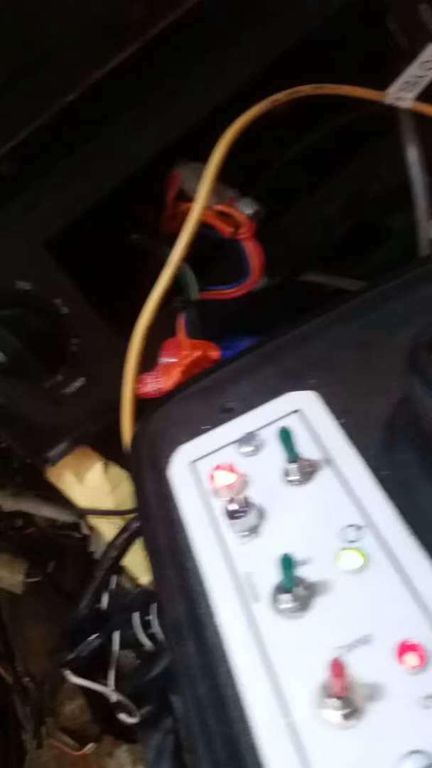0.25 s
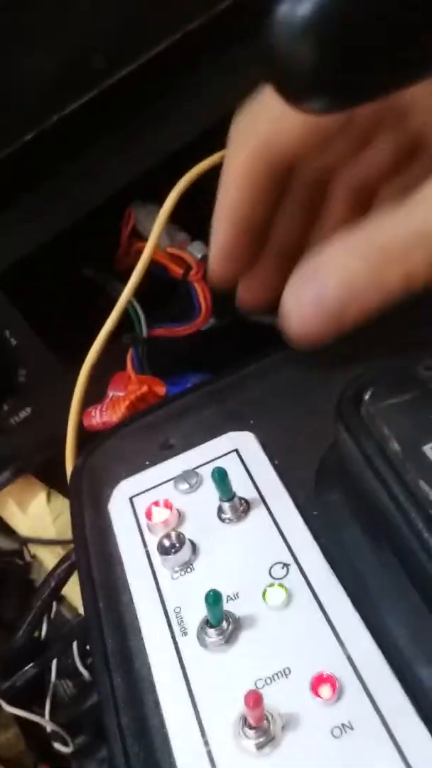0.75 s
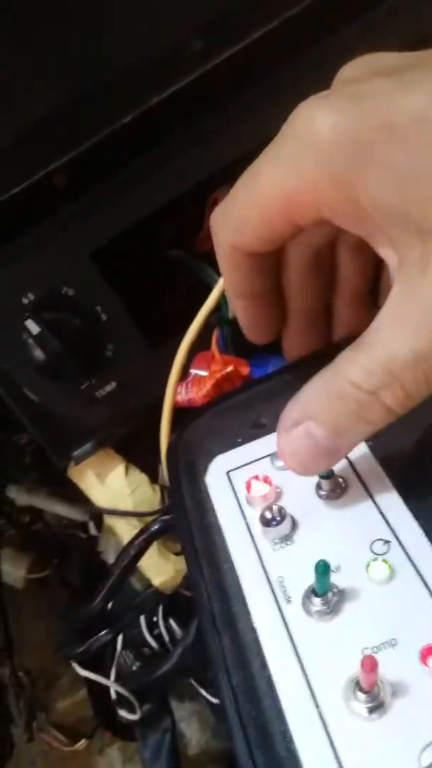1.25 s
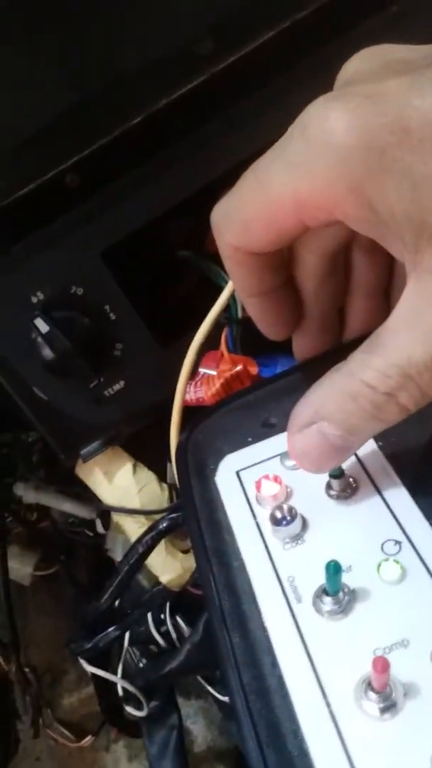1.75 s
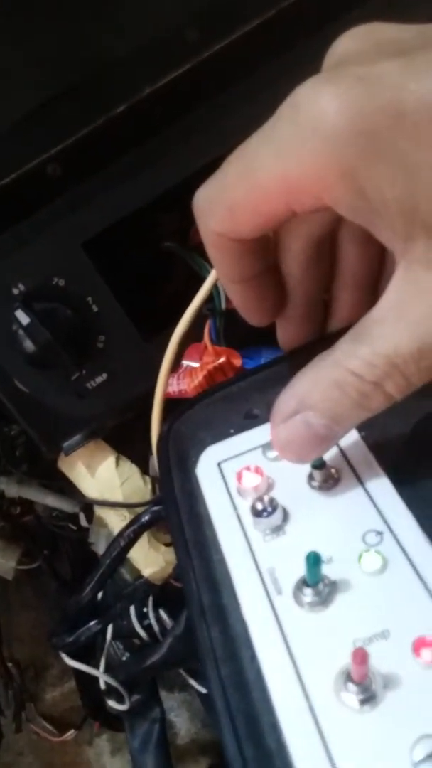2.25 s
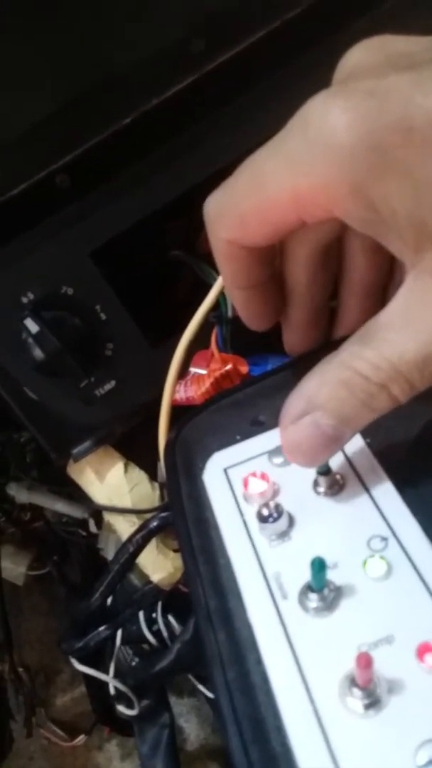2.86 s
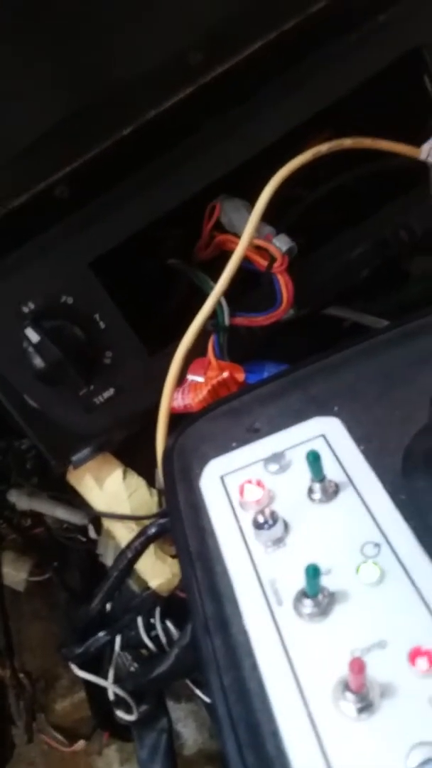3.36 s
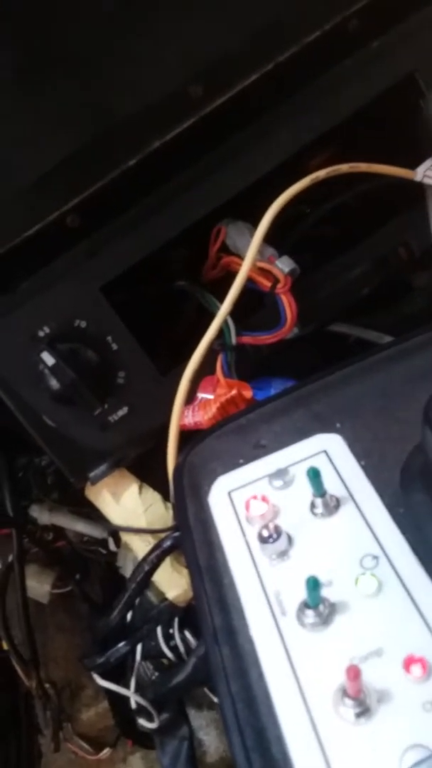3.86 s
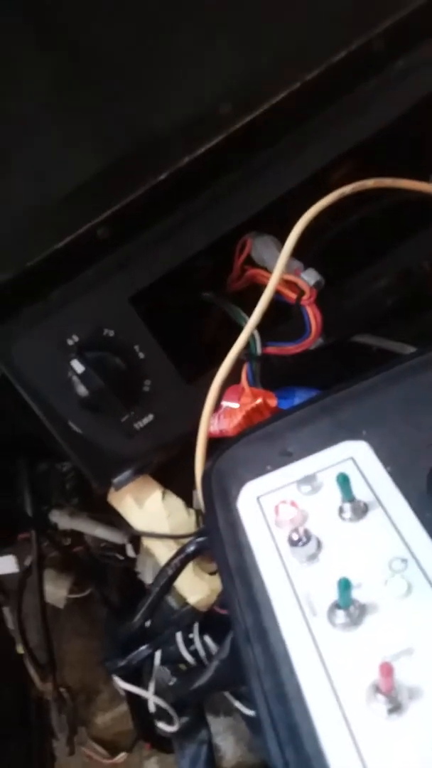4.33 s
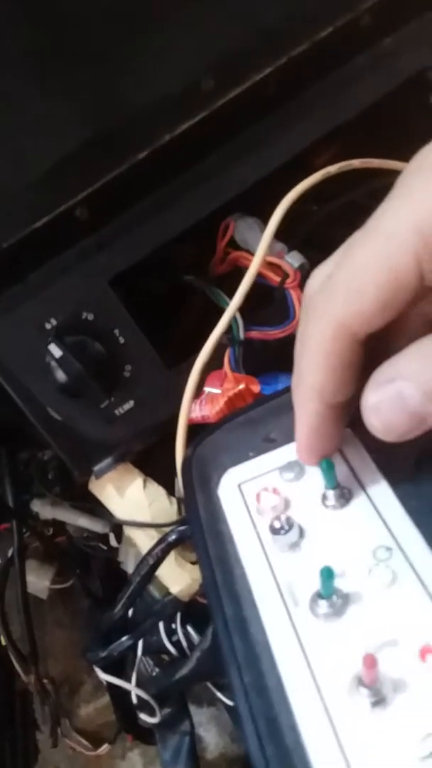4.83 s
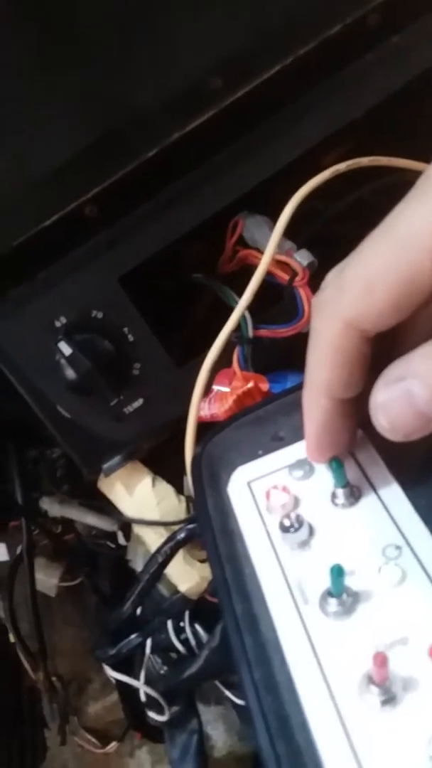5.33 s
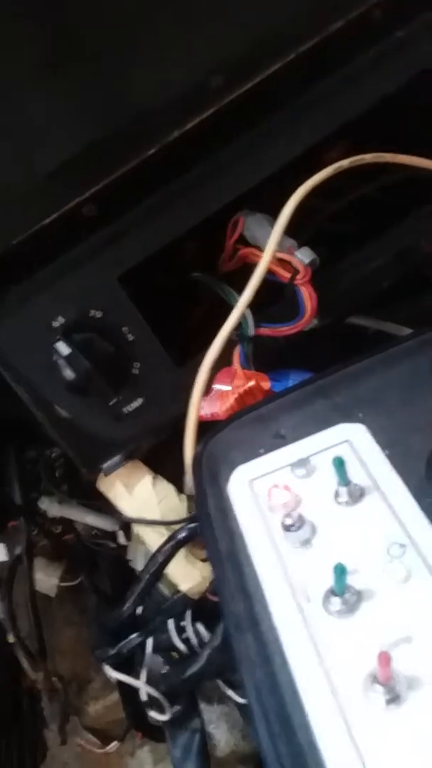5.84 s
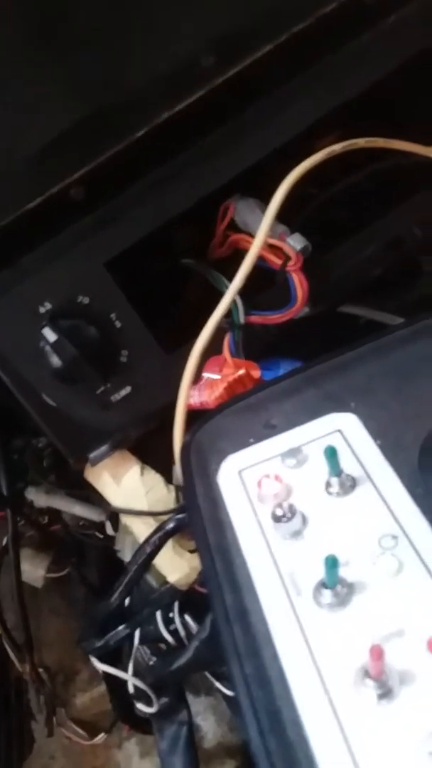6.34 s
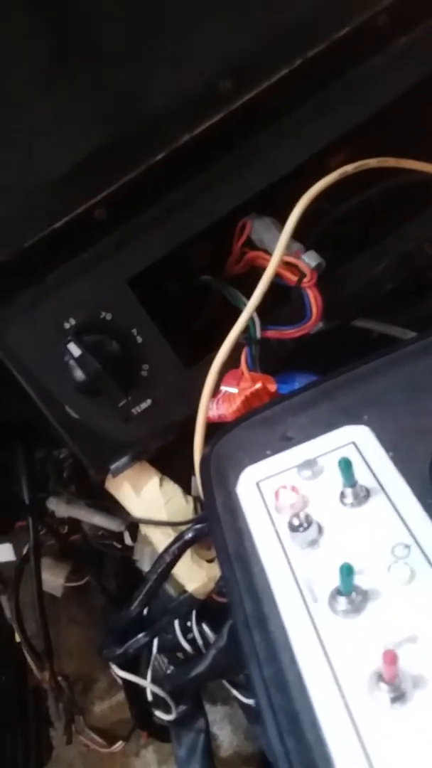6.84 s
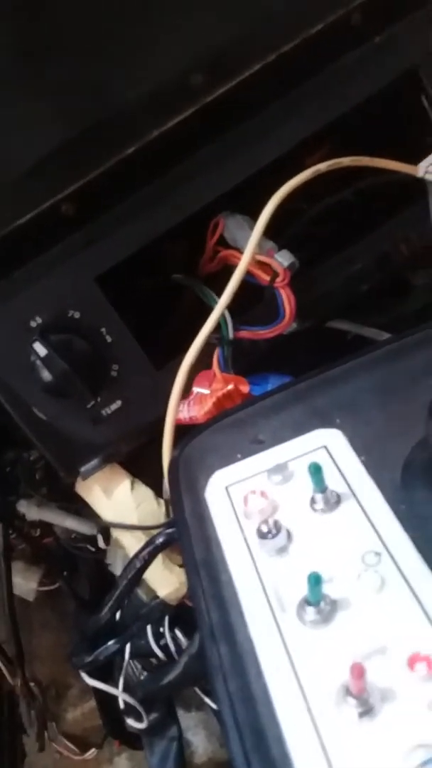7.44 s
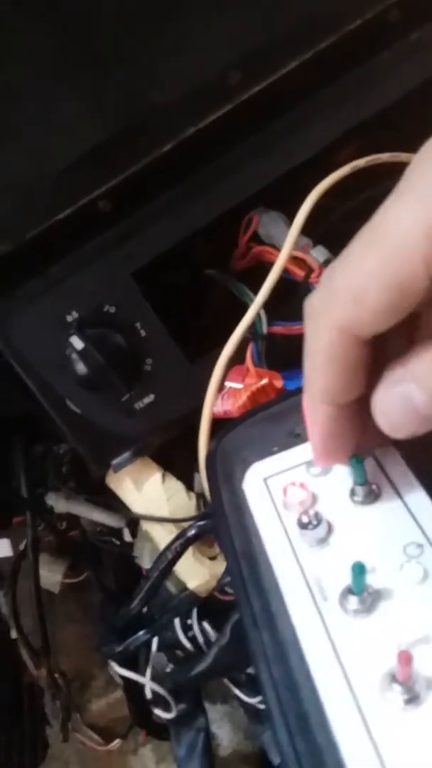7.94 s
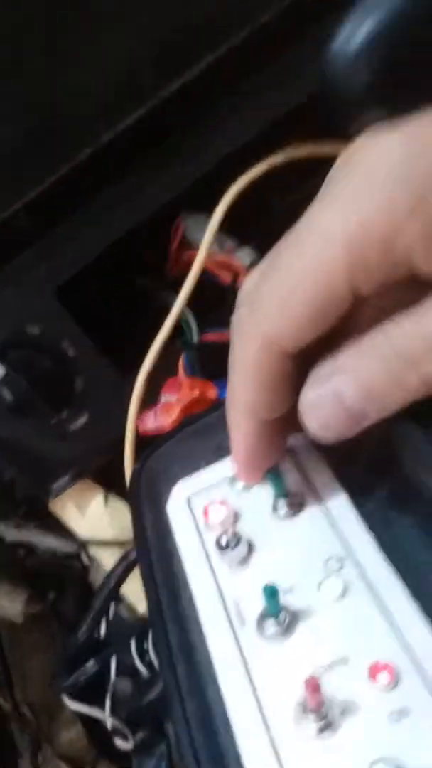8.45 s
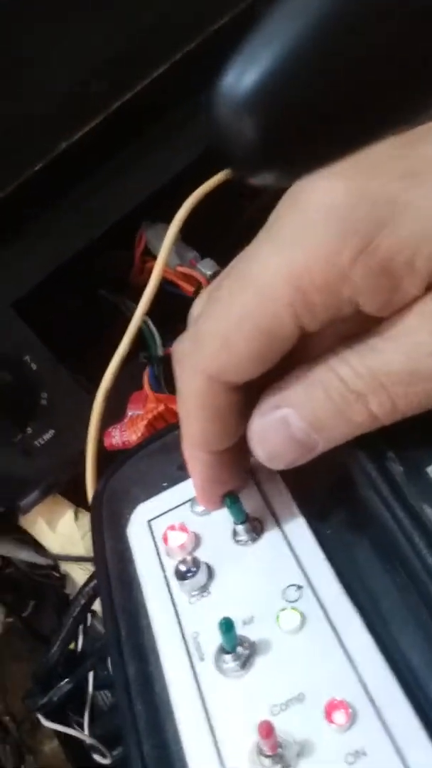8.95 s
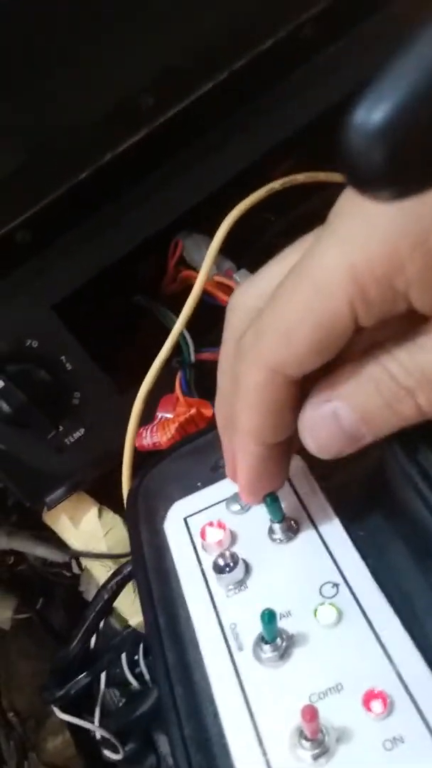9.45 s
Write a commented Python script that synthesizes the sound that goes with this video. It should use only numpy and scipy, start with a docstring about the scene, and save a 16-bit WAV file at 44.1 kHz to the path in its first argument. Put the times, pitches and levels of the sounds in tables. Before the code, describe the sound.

A handheld stereo microphone in a small, soft-trimmed cabin hears rumbling duct air and hissy vents, with motor hum underneath. Two isolated switch clicks come first. Then a loud cluster of clacks steps the blower down, and a finger bumps the microphone with a boom that makes the sound dip briefly. The fan spins down, leaving the compressor's steady drone, narrow whine and faint hiss.

```python
"""Blower and compressor in a vehicle

A ventilation blower rushes: turbulent noise shaped by ducts and vents. It is turned down and slows.
A mains-driven compressor hums, its shaft beating slowly with a second hum, while its valve whines as
noise in narrow resonances. Switches click by ringing plastic housing modes under a short rattle.
A finger knocks the phone, a pressure spike and a falling boom, and its gain ducks for about a second."""
import sys
import numpy as np
from scipy import signal
from scipy.fft import rfft, irfft, next_fast_len
from scipy.io import wavfile
from scipy.ndimage import uniform_filter1d

SR = 44100
rng = np.random.default_rng(int(sys.argv[2]) if len(sys.argv) > 2 else 0)


def dump(signal):
    """Clip the signal to [-1, 1] and save it as 16-bit WAV at the path in sys.argv[1]."""
    limited = np.clip(np.atleast_2d(signal).T, -1, 1)
    pcm = np.round(limited * 32767).astype(np.int16)
    wavfile.write(sys.argv[1], SR, pcm)


N = 427329
T = np.arange(N) / SR
SIZE = next_fast_len(N)
HZ = np.maximum(np.arange(SIZE // 2 + 1) * SR / SIZE, 1.)
SIDE = np.array([[1], [-1]])  # left, right
SHAFT_HZ = 58.15


def undb(db):
    """Decibel law: amplitude gain of a dB value."""
    return 10 ** (np.asarray(db) / 20)


def level(x, db):
    """Root mean square: scale both ports so that their mean has this rms in dB."""
    return x * undb(db) / np.sqrt(np.mean(x.mean(0) ** 2))


def shape(table, hz=HZ):
    """Logarithmic frequency scale: interpolate a (Hz, value) table on it."""
    table_hz, values = np.transpose(table)
    return np.interp(np.log(hz), np.log(table_hz), values)


def colour(table):
    """Spectral envelope: gain at each frequency from a (Hz, dB) table."""
    return undb(shape(table))


def resonances(modes, order):
    """Resonance: gain of several (Hz, width Hz, dB) peaks whose powers add; a higher order is narrower."""
    power = 0
    for hz, width, db in modes:
        detuning = (HZ ** 2 - hz ** 2) / (HZ * width)
        power = power + undb(db) ** 2 / (1 + detuning ** 2) ** order
    return np.sqrt(power)


def walk(rate):
    """Slow random fluctuation: levels held 1 / rate seconds and slewed twice, with a spread near 1."""
    k = int(SR / rate)
    held = np.repeat(rng.standard_normal(N // k + 1), k)
    return 1.43 * uniform_filter1d(uniform_filter1d(held, k), k)[:N]


def settle(start_s, time_s):
    """Exponential relaxation: share 0-1 of a change that begins at start_s."""
    return 1 - np.exp(-np.maximum(T - start_s, 0) / time_s)


def tone(hz, db):
    """Phase accumulation: a sine on a steady or moving pitch, rms level in dB."""
    turns = np.cumsum(hz + 0 * T) / SR + rng.random()
    return np.sqrt(2) * undb(db) * np.sin(2 * np.pi * turns)


# share of noise power common to both ports: frequency_hz, likeness (0-1)
PORT_LIKENESS = [(60, 1), (250, 0.93), (330, 0.81), (400, 1), (750, 0.76), (980, 0.65), (1150, 0.68),
                 (1600, 0.48), (2000, 0.59), (3000, 0.19), (6000, 0.15), (16000, 0.05)]
# level difference of the ports: frequency_hz, left_minus_right_db
PORT_BALANCE = [(60, 4), (130, -3.5), (190, 1), (290, -3.5), (450, 5), (630, 2), (800, -3.5), (1300, -4.5),
                (2000, -6.5), (2700, -0.5), (4000, 3), (7000, -2), (9000, 6.5), (14000, 0.5)]
# phase difference of the ports: frequency_hz, left_lead_rad
PORT_LEAD = [(60, -0.5), (250, 0.44), (420, 1), (680, 0), (830, 0.33), (1000, 2), (1300, 3), (1500, 4.5),
             (1940, 4.5), (2400, 5.5), (3300, 9), (6000, 18.5), (16000, 40)]


def ports(gain, drive=1):
    """Partial coherence: two ports pick up shared noise with a phase lead, plus noise of their own."""
    likeness = np.clip(shape(PORT_LIKENESS), 0, 1)
    pickup = undb(SIDE * shape(PORT_BALANCE) / 2)
    shared = np.sqrt(likeness) * pickup * np.exp(.5j * shape(PORT_LEAD) * SIDE)
    own = np.sqrt(1 - likeness) * pickup
    # gain that the mean of both ports keeps, divided out below
    centre = np.sqrt(np.abs(shared.mean(0)) ** 2 + (own ** 2).sum(0) / 4)
    noise = rfft(drive * rng.standard_normal((3, N)), SIZE)
    return irfft((noise[0] * shared + noise[1:] * own) * gain / centre, SIZE)[:, :N]


# steps that turn the blower down: start_s, flow_change_db, time_constant_s
TURN_DOWNS = [(6.3, -8.5, 0.35), (6.9, -9, 0.65), (7.2, -12, 0.79)]
# spectrum of air in the ducts: frequency_hz, relative_level_db (per Hz)
DUCT_SPECTRUM = [(39, -20), (66, -9), (85, -10), (106, -1.5), (124, -0.5), (198, -3), (317, -11.5),
                 (469, -14), (864, -14), (1160, -19), (1450, -16), (1640, -22.5), (1980, -17.5),
                 (2180, -24), (2800, -41), (3640, -59), (6160, -120)]
# duct resonances: frequency_hz, width_hz, level_db (over the broad rush)
DUCT_MODES = [(101.8, 13, 1.5), (146.6, 13.5, 0.5), (202.7, 16, 2.5), (258, 17, -1), (278, 37, 1.5),
              (855, 107, 1), (1422, 44, 3.5), (1532, 55, 5.5)]
# spectrum of jets at the vents: frequency_hz, relative_level_db (per Hz)
VENT_SPECTRUM = [(1410, -35), (2400, -0.5), (3100, -11.5), (3500, -9.5), (4720, -16), (8020, -16),
                 (9880, -28.5), (12800, -24.5), (14500, -30.5), (16400, -30)]


def blower():
    """Flow noise: turbulence fills ducts and vents; jets die faster than the rumble as the flow falls."""
    flow_db = sum(db * settle(s, time_s) for s, db, time_s in TURN_DOWNS)
    duct_gain = colour(DUCT_SPECTRUM) * np.sqrt(1 + resonances(DUCT_MODES, order=2) ** 2)
    ducts = level(ports(duct_gain), -30)
    jets = level(ports(colour(VENT_SPECTRUM)), -47.5) * undb(1.04 * walk(6.5))
    return ducts * undb(flow_db + 0.34 * walk(4.29)) + jets * undb(1.25 * flow_db)


# partials of the slowing rotor: multiple, relative_level_db
ROTOR_ORDERS = [(1, 4), (2, -8), (3, -8)]


def rotor():
    """Forced vibration: a slowing rotor shakes its mount most near resonance; a thin whine sinks."""
    start_s, start_hz, end_hz, settle_s, rotor_db = 7.3, 53.5, 47.1, 1.8, -50
    mount_hz, mount_width_hz = 51, 3
    shaft_hz = start_hz + (end_hz - start_hz) * settle(start_s, settle_s)
    mount_db = -10 * np.log10(1 + (2 * (shaft_hz - mount_hz) / mount_width_hz) ** 2)
    shake = 0
    for k, db in ROTOR_ORDERS:
        resonance_db = mount_db * (k == 1)  # only the fundamental meets the mount's resonance
        shake = shake + tone(k * shaft_hz, rotor_db + db + resonance_db)
    shake = shake * settle(start_s, 0.13)

    whine_s, whine_start_hz, whine_end_hz, whine_settle_s = 7.6, 686, 604, .72
    whine_hz = whine_start_hz + (whine_end_hz - whine_start_hz) * settle(whine_s, whine_settle_s)
    whine_db = -51.5 - 3.5 * np.maximum(T - whine_s, 0)  # fades 3.5 dB a second
    whine = tone(whine_hz + 0.52 * walk(11), whine_db + 0.62 * walk(8))
    return shake + settle(whine_s, 0.04) * whine


# second hum, interpolated between rows: time_s, hz_above_shaft, level_db
SECOND_HUM = [(0, 0.21, -41), (1.3, 0.77, -39.5), (3.5, 0.94, -39), (4.3, 0.51, -38), (5.35, 0.62, -32.5)]


def shafts():
    """Beats: the compressor shaft hums beside a slightly faster second hum, which then dies."""
    shaft_db, lead_turns, dies_s = -41.5, -0.36, 0.074
    s, faster_hz, second_db = np.transpose(SECOND_HUM)
    turns = SHAFT_HZ * T + rng.random()
    lead = lead_turns + np.cumsum(np.interp(T, s, faster_hz)) / SR
    second_gain = undb(np.interp(T, s, second_db)) * (1 - settle(s[-1], dies_s))
    shaft = undb(shaft_db) * np.sin(2 * np.pi * turns)
    second = second_gain * np.sin(2 * np.pi * (turns + lead))
    return np.sqrt(2) * (shaft + second)


# steady tones of mains and motor: frequency_hz, level_db
MAINS_AND_MOTOR = [(120, -36.5), (178.3, -55.5), (233, -50), (240, -48), (725, -67), (753.7, -61.5),
                   (790, -62), (1513, -62.5), (2908, -67.5), (7154, -82), (7506, -77)]


def steady_tones():
    """Line spectrum: sines of mains and motor waver slightly, each with its balance at the ports."""
    hum = 0
    for hz, db in MAINS_AND_MOTOR:
        balance = undb(.5 * SIDE * shape(PORT_BALANCE, hz))
        hum = hum + tone(hz, db + 0.2 * walk(7.8)) * balance
    return hum


# valve whine resonances: frequency_hz, width_hz, relative_level_db
VALVE_MODES = [(1860, 17, -14.5), (1939, 24, 0.5), (1954, 22, 2), (1994, 18, 3.5), (2126, 56, -10)]
# low throb of the pump head: frequency_hz, width_hz, relative_level_db
HEAD_MODES = [(650, 150, 0), (849, 81, -.6)]


def gas_pulses():
    """Modulated noise in resonators: gas puffs twice a turn and excites the valve and pump head."""
    turn = 2 * np.pi * SHAFT_HZ * T
    puff = 1 + 0.16 * np.cos(turn) + .5 * np.cos(2 * turn)
    flutter = undb(1.2 * walk(9.1) + 2.3 * walk(30))
    whine = level(ports(resonances(VALVE_MODES, order=2), puff * flutter), -43)
    head = level(ports(resonances(HEAD_MODES, order=2), puff), -55.5)
    return whine + head


# spectrum of the compressor casing: frequency_hz, relative_level_db (per Hz)
CASING_SPECTRUM = [(39, -29), (66, -9), (84, -15), (100, -13.5), (124, -8.5), (169, -12), (246, -13.5),
                   (317, -24), (376, -21), (484, -27.5), (621, -22.5), (1150, -30.5), (1640, -27),
                   (1980, -15), (2320, -30.5), (2800, -54), (3640, -68), (6160, -120)]


def casing():
    """Structural radiation: the compressor casing rumbles as steady coloured noise."""
    return level(ports(colour(CASING_SPECTRUM)), -42.5)


# plastic housing modes: frequency_hz, relative_level_db, t60_s (of the mode alone)
HOUSING_MODES = [(1420, -3.5, 0.018), (2530, -7, 0.015), (3400, -7, 0.018), (3770, -6.5, 0.015),
                 (4320, -10, 0.0065), (5416, -3, .008), (6130, -6, 0.0088), (6390, -2, 0.011),
                 (6870, 1, 0.0092), (7364, 2.5, 0.011), (7680, -0.5, 0.0063), (8000, -4, .01),
                 (8650, -7, .008), (10400, -10, .006), (11450, -6, 0.005), (11910, -5.5, 0.0053),
                 (12520, -2, 0.0038), (13640, -8, .006), (14400, -4, .006), (15550, -6, 0.005)]
# spectrum of the rattle: frequency_hz, relative_level_db (per Hz)
RATTLE_SPECTRUM = [(530, -39.5), (900, -12), (1430, -3), (2960, -15.5), (4750, -13.5), (5430, -7),
                   (6840, -13), (7540, -29), (8310, -12), (9850, -15), (11700, -11), (15600, -20),
                   (16400, -25)]


def snap(t60, tilt_db, rattle_db, favoured_hz):
    """Modal synthesis: a snap rings the housing modes, some more than others, under noise rattle."""
    t = np.arange(8192) / SR
    hz = np.maximum(np.arange(4097) * SR / 8192, 1.)
    mode_hz, mode_db, mode_t60 = np.transpose(HOUSING_MODES)[:, :, None]
    chance, start = rng.standard_normal((3, 8192)), rng.random((2, len(HOUSING_MODES), 1))
    t60 = max(t60, .003)
    rise = (1 - np.exp(-t / .001)) ** 2

    def tilt(f):
        """Spectral slope: dB per octave about 7 kHz."""
        return tilt_db * np.log2(np.clip(f, 800, 16000) / 7000)

    def favour(f):
        """Selective excitation: a 13 dB bump, .07 octave in half-width, at each favoured pitch."""
        return sum(13 * np.exp(-(np.log2(f / g) / .07) ** 2) for g in favoured_hz)

    # the right port hears each mode a little shifted
    shifted = start[0] + 0.23 * np.sign(start[1] - .5)
    turns = mode_hz * t + np.array([start[0], shifted])
    decay_db = -60 * t / (min(t60, .008) + mode_t60)
    mode_gain = undb(mode_db + tilt(mode_hz) + favour(mode_hz) + decay_db)
    ring = rise * np.sum(mode_gain * np.sin(2 * np.pi * turns), axis=1)

    rattle = (chance[0] + 1.7 * chance[1:]) * rise * undb(-60 * t / t60)
    rattle = irfft(rfft(rattle) * undb(shape(RATTLE_SPECTRUM, hz) + tilt(hz) + 0.5 * favour(hz)))
    return (ring / peak(ring) + undb(rattle_db) * rattle / peak(rattle))[:, :7168]


def peak(x):
    """Short-time energy: the highest rms in any 2 ms, over both ports."""
    return np.sqrt(np.max(uniform_filter1d(np.mean(x ** 2, axis=0), size=88)))


def cabin_tail(x):
    """Reverberation: the cabin answers with decaying noise whose top is swallowed by soft trim."""
    t60_s, tail_db, top_hz = 0.27, -24, 8980
    t = np.arange(SR // 4) / SR
    cabin = rng.standard_normal((2, len(t))) * undb(-60 * t / t60_s) * (t > .003)
    cabin = signal.lfilter(*signal.butter(1, top_hz, fs=SR), cabin)
    return signal.fftconvolve(x, undb(tail_db) * cabin / np.sqrt(np.sum(cabin[0] ** 2)), axes=1)


# switch and latch clicks: start_s, peak_db (2 ms rms, before the common cut of 7.8 dB),
# left_minus_right_db, t60_s (at least .003 is used), brightness_db_per_octave,
# rattle_over_ring_db, then four favoured pitch_hz
SWITCH_CLICKS = [(1.2105, -25, -4, .012, -1, 0, 7680, 12520, 6390, 7364),
                 (1.2807, -9.5, -5, 0.0044, 5.5, -9, 7680, 12900, 3640, 2530),
                 (1.2825, -23, -6, .008, -4, -4, 6870, 14400, 13300, 2500),
                 (2.8516, -14.5, -5, 0.01, 1.5, 2, 6130, 7680, 2610, 4320),
                 (6.2455, -29, 0, .008, 0, -3, 7680, 11450, 6390, 3770),
                 (6.2494, -22, 4.5, 0.008, 2, -3, 7680, 6390, 14400, 12520),
                 (6.254, -15.5, -2, 0.006, 4, 1, 11450, 8000, 7364, 4320),
                 (6.2575, -24, 2, .012, 5, 0, 6130, 1420, 14400, 4320),
                 (6.2657, -4, -2, 0.014, 3, -1.5, 5416, 7680, 15550, 11450),
                 (6.2675, -9, 1, 0.02, -1.5, 2, 1420, 4320, 2640, 12520),
                 (6.273, -20, 3, 0.045, 1, 16, 1420, 4320, 6390, 8650),
                 (6.4173, -28.5, 1, .02, -3, 2, 7680, 11910, 6870, 4320),
                 (6.428, -31, -1, .02, -4, 4, 8000, 6390, 11910, 4320),
                 (6.7155, -33, 9, .02, -3, 3, 7364, 3500, 11450, 4320),
                 (6.7178, -19, 2, 0.018, 2.5, -1, 3850, 8000, 11910, 15200),
                 (6.7218, -24.5, 0, .03, -2.5, 3, 4320, 3400, 8000, 13640),
                 (6.733, -31, 0, .04, -4, 8, 3300, 7364, 8650, 14400),
                 (6.8922, -11.5, -1, 0.049, 2, -5, 8200, 13640, 7600, 6600),
                 (6.9, -17.5, -4, 0.066, -4.5, 3, 1510, 6390, 2600, 5416),
                 (6.904, -24, 5, 0.058, -1, 8, 6600, 8650, 14400, 11910),
                 (6.925, -32, 2, 0.29, -4, 15, 7364, 6390, 8300, 14400)]


def clicks():
    """Impulse response: each switch snap is placed in time and side, followed by the cabin's tail."""
    out = np.zeros((2, N + SR))
    for s, db, pan_db, t60, tilt_db, rattle_db, *favoured_hz in SWITCH_CLICKS:
        click = snap(t60, tilt_db, rattle_db, favoured_hz)
        click *= undb(db) / peak(click) / np.sqrt(6)  # the common cut of 7.8 dB
        i = int(s * SR)
        out[:, i:i + 7168] += click * undb(SIDE * pan_db / 2)
    return out[:, :N] + cabin_tail(out)[:, :N]


# knocks on the phone: start_s, spike_db, spike_s, boom_db, boom_start_hz, boom_end_hz, boom_t60_s,
# right_port_db (relative to the left)
PHONE_KNOCKS = [(6.729, -28, .0008, -18, 240., 170., .06, -1),
                (6.8941, -.5, .0003, -6, 122., 50., .13, -22)]


def knocks():
    """Impact: a pressure spike at the port, then the phone's body swings with a falling pitch."""
    out, fall_s = 0, .009
    for s, spike_db, spike_s, boom_db, start_hz, end_hz, t60, right_db in PHONE_KNOCKS:
        t = np.maximum(T - s, 0)
        spike = -undb(spike_db) * t / spike_s * np.exp(1 - t / spike_s)
        turns = end_hz * t + (start_hz - end_hz) * fall_s * (1 - np.exp(-t / fall_s))
        boom = undb(boom_db - 60 * t / t60) * np.sin(2 * np.pi * turns)
        out = out + (spike + boom) * undb([[0], [right_db]])
    return out


# spectrum of the hiss, which also colours the buzz: frequency_hz, relative_level_db (per Hz)
HISS_SPECTRUM = [(1290, -36), (2200, 0), (2310, -7.5), (2780, -12), (3000, -15), (3270, -14), (3550, -18),
                 (3860, -26.5), (4610, -27.5), (7380, -22), (9900, -33.5), (12900, -22.5), (14500, -29),
                 (16400, -31)]


def buzz():
    """Fourier series: what repeats on every shaft turn is a faint comb of high multiples."""
    buzz_db, scatter_db = -61, 3
    hz = SHAFT_HZ * np.arange(48, 220)
    chance = rng.standard_normal((len(hz), 2)).T
    strength = undb(shape(HISS_SPECTRUM, hz) + scatter_db * chance[0])
    lines = strength * np.exp(2j * np.pi * chance[1])
    comb = np.zeros((2, len(HZ)), complex)
    bins = np.round(hz * SIZE / SR).astype(int)
    comb[:, bins] = lines * np.exp(.5j * SIDE * shape(PORT_LEAD, hz))
    x = irfft(comb, SIZE)[:, :N]
    return x * undb(buzz_db) / np.sqrt(np.mean(x ** 2))


def hiss():
    """Stationary noise: a faint steady hiss with a fixed spectrum."""
    return level(ports(colour(HISS_SPECTRUM)), -53)


def scene():
    """Superposition: all sources add at the two ports."""
    compressor = shafts() + steady_tones() + gas_pulses() + casing() + buzz()
    return blower() + rotor() + compressor + clicks() + knocks() + hiss()


def record(dry):
    """Gain control: a loud low thump lowers the gain, which holds, then glides back; band limits follow."""
    duck_db, glide_s, hold_s, loud_db = -5.5, .055, 1.1, -16.5
    bass = uniform_filter1d(dry, size=45)  # 1 ms mean
    power = uniform_filter1d(np.max(bass ** 2, axis=0), size=661, origin=330)  # over the last 15 ms
    loud = np.flatnonzero(power > undb(loud_db) ** 2)
    target_db = np.zeros(N)
    for i in loud[::32]:
        target_db[i:i + int(hold_s * SR)] = duck_db
    keep = np.exp(-1 / (glide_s * SR))
    gain = undb(signal.lfilter([1 - keep], [1, -keep], target_db))
    bass_cut = signal.butter(2, 42, "high", fs=SR, output="sos")
    top_cut = signal.ellip(11, .2, 60, 15700, fs=SR, output="sos")
    return signal.sosfilt(top_cut, signal.sosfilt(bass_cut, dry * gain))


dry = scene()
out = record(dry)
dump(out)
```